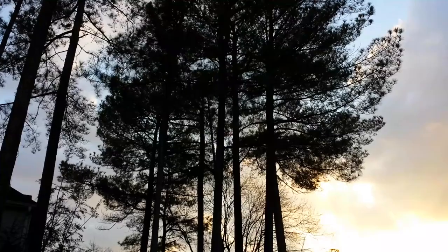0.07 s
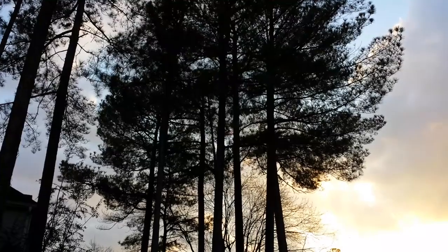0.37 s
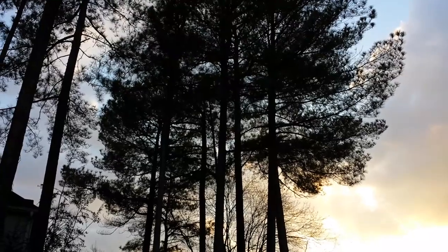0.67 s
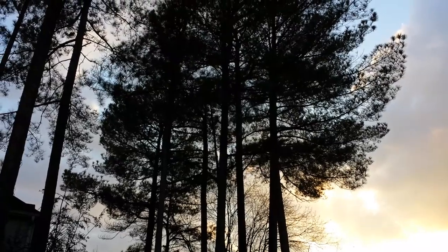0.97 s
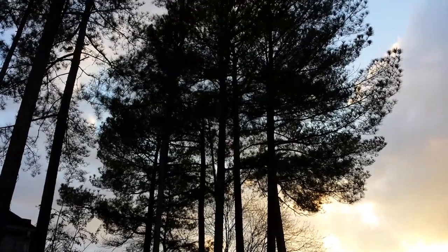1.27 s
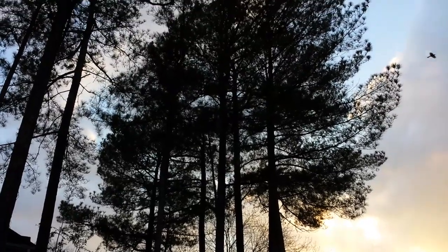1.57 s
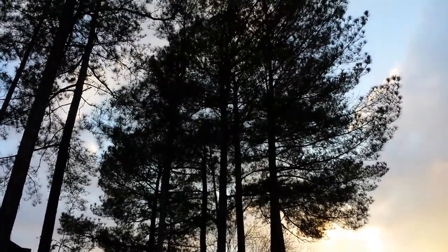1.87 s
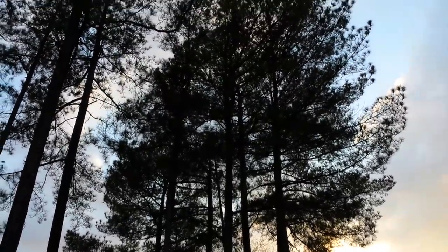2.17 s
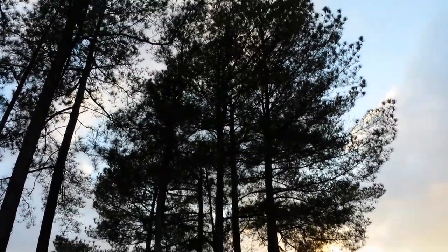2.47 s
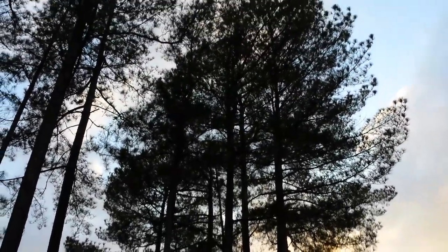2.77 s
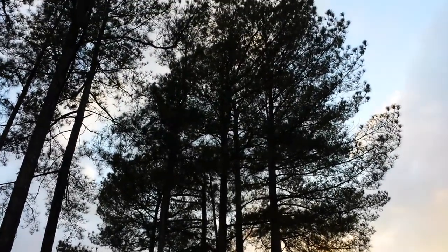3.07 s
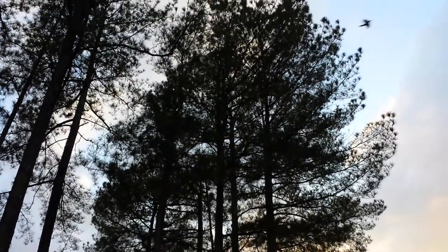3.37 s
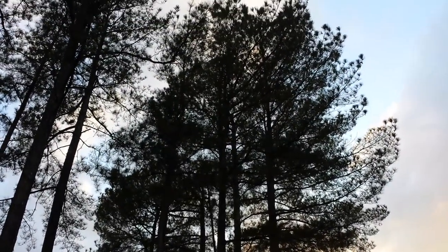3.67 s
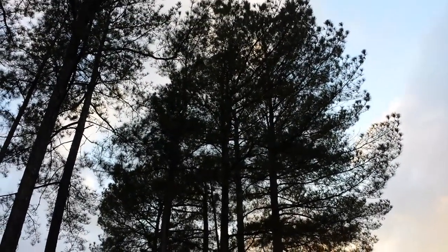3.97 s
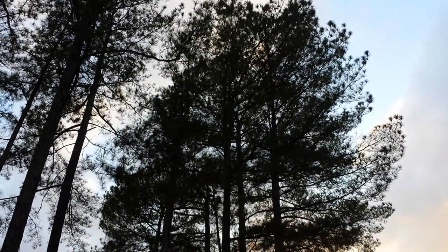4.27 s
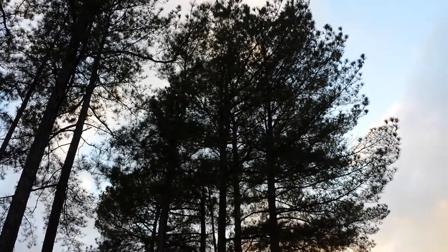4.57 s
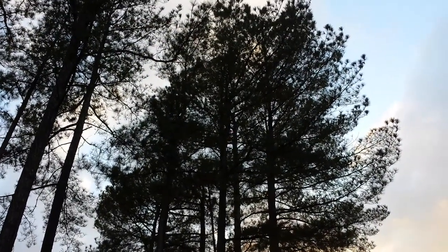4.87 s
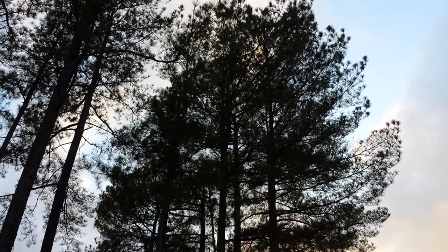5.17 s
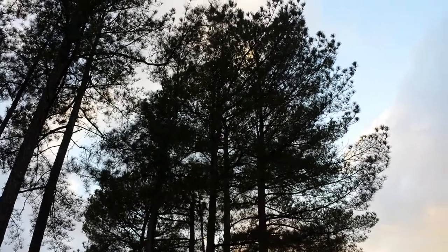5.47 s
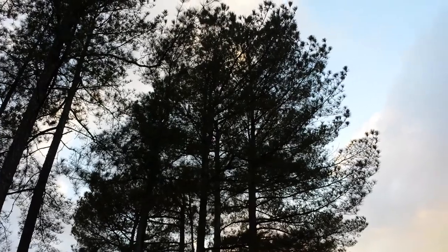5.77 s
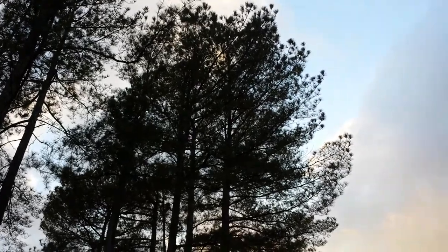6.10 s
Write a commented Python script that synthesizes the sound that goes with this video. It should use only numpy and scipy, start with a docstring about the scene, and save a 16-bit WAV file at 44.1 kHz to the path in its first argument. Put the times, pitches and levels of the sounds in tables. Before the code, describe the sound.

A large flock of birds chatters in tall pines, with nearer whistles and harsh calls over a faint low motor hum.

```python
"""Out of silence, a large flock of birds fades in, chattering in tall pines over a low rumble.
Hundreds of whistles and rasps merge into a chorus, scattered by trunks and crowns, and a far-off motor
starts to hum. Nearer birds then stand out with whistles, falling notes and harsh calls.
From about halfway a few ticks sound close to the single microphone, and a rustle there ends the scene."""
import sys
import numpy as np
from scipy import signal
from scipy.fft import rfft, irfft, next_fast_len
from scipy.io import wavfile
from scipy.ndimage import uniform_filter1d

SR = 44100
rng = np.random.default_rng(int(sys.argv[2]) if len(sys.argv) > 2 else 0)


def master(y):
    """Save y as 16-bit WAV."""
    cut = np.clip(np.atleast_2d(y).T, -1, 1)
    pcm = np.round(cut * 32767)  # scale
    wavfile.write(sys.argv[1], SR, pcm.astype(np.int16))


N = 279373


def from_db(db):
    """Turn decibels into a factor to multiply by."""
    return 10 ** (np.asarray(db) / 20)


def rms_one(x):
    """Scale a sound so that its average level (rms) is 1."""
    return x / np.sqrt(np.mean(x ** 2) + 1e-20)


def in_time(points):
    """Join (time, value) points with straight lines, giving a value for every sample."""
    times, values = np.transpose(points)
    return np.interp(np.arange(N) / SR, times, values)


def at_hz(points, hz):
    """Read a level between (frequency, level) points, with octaves evenly spaced."""
    frequencies, levels = np.transpose(points)
    return np.interp(np.log(np.maximum(hz, 1)), np.log(frequencies), levels)


def coloured(x, spectrum):
    """Make some frequencies louder and others softer; the result has rms 1."""
    size = next_fast_len(N)
    gain = from_db(at_hz(spectrum, np.fft.rfftfreq(size, 1 / SR)))
    return rms_one(irfft(rfft(x, size) * gain, size)[:N])


def wander(rate, size):
    """A random wobble that strays by about 1 and heads for a new value `rate` times a second."""
    steps = np.arange(size) * rate / SR + rng.random()
    values = rng.standard_normal(int(steps[-1]) + 2)
    return np.interp(steps, np.arange(len(values)), values) * np.sqrt(3 / 2)


def add(out, start, sound):
    """Mix a sound in at a time in seconds."""
    at = int(np.clip(start * SR, 0, N))
    out[at:at + len(sound)] += sound[:N - at]


def progress(length):
    """Count from 0 to 1 over a note's length in seconds."""
    return np.linspace(0, 1, max(int(length * SR), 64))


def curved_glide(length, hz, slide_hz, bend):
    """A slide through a pitch, with both ends lifted by `bend`, a share of that pitch."""
    from_middle = progress(length) - .5
    return hz * (1 + bend * (2 * from_middle) ** 2) + slide_hz * from_middle


def bird_note(glide, rough_hz, rough_rate, flutter_db, edge_s, overtone_db):
    """A tone follows a glide in Hz, shaking in pitch and level, with up to two overtones; rms 1."""
    # how loud an overtone is, by where it falls: (frequency [Hz], level [dB])
    overtones = [(4000, -9), (8400, -30), (9800, -38), (11100, -32.5), (12400, -33), (13500, -52),
                 (15500, -44)]
    size = len(glide)
    pitch = glide + rough_hz * wander(rough_rate, size)
    phase = (2 * np.pi * np.cumsum(pitch) / SR).astype(np.float32)
    tone = np.sin(phase)
    for k in (2, 3):
        if k * glide.max() < SR / 2:
            tone = tone + from_db(overtone_db + at_hz(overtones, k * glide[size // 2])) * np.sin(k * phase)
    along = np.linspace(0, 1, size)
    soft_edges = np.minimum(np.minimum(along, 1 - along) * size / SR / edge_s, 1)
    swell = 1 + 0.27 * np.sin(np.pi * along) ** 2
    flutter = from_db(flutter_db * wander(90, size))
    return rms_one(tone * soft_edges * swell * flutter)


def tree_echoes(x, echo_db):
    """Trunks and crowns send back a dying cloud of small echoes; the overall power stays the same."""
    echoes_per_s, delay_s, die_away_s = 2500, .006, .4
    t = np.arange(int(.7 * SR)) / SR
    echoes = rng.standard_normal(len(t)) * (rng.random(len(t)) < echoes_per_s / SR) * (t > delay_s)
    echoes *= from_db(-60 * t / die_away_s)
    response = from_db(echo_db) * echoes / np.linalg.norm(echoes)
    response[0] = 1  # the sound that arrives directly
    return signal.fftconvolve(x, response / np.linalg.norm(response))[:N]


def chorus(low_hz, high_hz, per_s):
    """Many birds in one pitch range call at random, some clear and some harsh, mostly sliding down."""
    # how loud a voice is, by its pitch: (pitch [Hz], level [dB])
    voice_levels = [(1100, -10.5), (1360, -17.5), (1600, -6), (1850, -11), (2400, -3), (3000, -9),
                    (3600, 1.5), (4250, -1), (4800, -5.5), (5400, -5.5), (6400, 0), (7000, -13.5),
                    (7700, -20)]
    out, count = np.zeros(N), int(per_s * N / SR)
    for k, (when, pitch, length, slide, bend, harsh, distance) in enumerate(rng.random((count, 7))):
        hz = low_hz + (high_hz - low_hz) * pitch
        glide = curved_glide(.025 + .1 * length ** 2, hz, slide_hz=-.44 * hz * (slide - .35),
                             bend=0.0997 * (bend - .5))
        overtone_db = 6.5 * rng.standard_normal()  # birds face every way, so their overtones differ
        note = bird_note(glide, rough_hz=hz * (0.015 + 0.0892 * harsh ** 2), rough_rate=1100,
                         flutter_db=1.5, edge_s=0.0098, overtone_db=overtone_db)
        gain = from_db(at_hz(voice_levels, hz) - 8.1 * distance)
        add(out, (k + 2 * when - 1) / per_s, gain * note)
    out = tree_echoes(out, echo_db=-3.0)
    return out / np.sqrt(uniform_filter1d(out ** 2, size=4000) + 1e-9)  # hold the level near rms 1


def flock():
    """Low, middle and high choruses and the blur of the farthest birds swell and ebb together."""
    # how hard the whole flock is calling: (time [s], level [dB])
    excitement = [(0.7, -1.5), (0.78, -4.5), (1.29, 0.5), (2.08, 1.5), (2.14, -1), (2.34, 1.0), (3.12, 0.5),
                  (3.19, 2.5), (3.9, -1.2), (4.03, 2.5), (4.1, 0), (4.41, -1.1), (4.58, 1.5), (5.05, 1.5),
                  (5.1, -3), (5.5, 1), (5.85, -0.3), (6.23, 0.8)]
    # the choruses: (lowest [Hz], highest [Hz], calls [per s], level [dB], follows excitement [factor])
    pitch_ranges = [(1202, 3100, 70, -38.5, 0.65), (3099, 4900, 75, -34.5, 1.4),
                    (4907, 7600, 70, -37.5, 1.1)]
    # the farthest birds blur into a smooth hiss: (frequency [Hz], level [dB])
    far_colour = [(500, -17), (1000, 1), (1600, 3.5), (2500, 8.5), (4000, 7), (6400, 4), (8000, -8),
                  (9800, -18.5), (12200, -21), (14000, -23.5), (15600, -26)]
    excitement_db = in_time(excitement)
    voices = sum(from_db(db + follows * excitement_db) * chorus(low, high, per_s)
                 for low, high, per_s, db, follows in pitch_ranges)
    far_birds = from_db(-35.5 + excitement_db) * coloured(rng.standard_normal(N), far_colour)
    return voices + far_birds


def distant_motor():
    """A motor's hum comes in over a low rumble and wavers about one pitch."""
    # the rumble swells and ebbs: (time [s], level [dB])
    rumble_levels = [(0.7, -48), (1.12, -43.5), (2.11, -43), (3.6, -47), (4.35, -40.5), (4.42, -44.5),
                     (4.82, -42.5), (4.92, -45.5), (6.33, -41.5)]
    # the rumble's deep tone colour: (frequency [Hz], level [dB])
    rumble_colour = [(20, -26), (35, -11.5), (52, -3.5), (68, -9.5), (90, 0), (150, 1.5), (190, 0.5),
                     (250, -3), (300, -3), (420, -7), (700, -7.5), (1000, -14.5), (1600, -15.5),
                     (4000, -69)]
    # how loud the hum's lowest tone is: (time [s], level [dB])
    hum_levels = [(0.7, -45.5), (1.67, -45.5), (1.72, -64), (1.75, -49.5), (2.11, -45.5), (4.04, -50.5),
                  (4.59, -44.5), (4.62, -56), (4.71, -42), (4.78, -59), (6.05, -47.5), (6.09, -55),
                  (6.25, -39.5), (6.33, -53)]
    # overtones that swell with the rumble: (multiple of the pitch [factor], level against the rumble [dB])
    hum_overtones = [(2, -6.5), (3, -12.5), (4, -20.5), (6, -18)]
    hum_hz, waver_hz, start_s, rise_s = 100.26, 1.197, 0.57, .11
    rumble_db = in_time(rumble_levels)
    phase = 2 * np.pi * np.cumsum(hum_hz + waver_hz * wander(12, N)) / SR
    hum = from_db(in_time(hum_levels) + 1.33 * wander(14, N)) * np.sqrt(2) * np.sin(phase)
    for k, db in hum_overtones:
        gain = from_db(rumble_db + db + 2.6 * wander(3.9, N))
        hum += gain * np.sin(k * phase + 0.42 * wander(12, N))
    entry = np.clip((np.arange(N) / SR - start_s) / rise_s, 0, 1)
    rumble = from_db(rumble_db) * coloured(rng.standard_normal(N), rumble_colour)
    return entry * hum + rumble


def shake(slide_hz, length):
    """How far a near note's pitch shakes, in Hz: steeper slides are rougher, up to a limit."""
    return min(32 + .003 * abs(slide_hz) / length, 120)


def whistles():
    """Near birds whistle clear notes, most of them nearly level in pitch."""
    # one whistle a row: (start [s], length [s], pitch [Hz], slide [Hz], level [dB])
    notes = [(.736, 0.1, 5470, 70, -41), (0.732, .19, 4280, -160, -37), (0.873, 0.16, 5120, 300, -36.5),
             (.901, .113, 3615, 76, -39), (1.225, 0.14, 3455, 166, -37), (1.316, 0.094, 4230, -410, -35),
             (1.928, 0.16, 1620, 17, -40.5), (2.238, 0.11, 2460, 900, -40), (2.28, .055, 4830, 90, -36),
             (2.331, .073, 4580, 800, -33), (2.599, .063, 4240, -330, -30), (2.649, 0.075, 4330, 150, -37),
             (3.047, 0.13, 4124, -100, -32.5), (3.132, 0.12, 3560, -870, -32.5),
             (3.201, .038, 4730, -60, -33), (3.45, 0.1, 4090, -15, -33), (3.53, 0.074, 3430, 130, -34.5),
             (3.601, .113, 4290, 0, -33.5), (3.71, 0.068, 4640, 650, -30.5),
             (3.728, 0.17, 4143, -230, -30.5), (3.776, 0.09, 4450, -310, -34),
             (4.007, 0.1, 3690, -54, -30.5), (4.309, 0.133, 5000, 240, -31.5),
             (4.432, 0.054, 2614, 120, -42), (4.501, 0.16, 4270, 90, -31), (4.661, 0.13, 4460, 286, -32),
             (4.669, 0.08, 3570, 57, -30), (5.038, 0.079, 3820, 26, -32), (5.449, 0.088, 4240, 73, -32.5),
             (5.52, .21, 3690, -880, -32), (5.903, 0.11, 4380, 120, -37), (6.221, 0.11, 4010, -670, -30.5),
             (6.261, 0.045, 6960, 920, -30)]
    out = np.zeros(N)
    for start, length, hz, slide_hz, db in notes:
        glide = curved_glide(length, hz, slide_hz, bend=0.2013 * length)
        note = bird_note(glide, shake(slide_hz, length), rough_rate=700,
                         flutter_db=3.0, edge_s=0.0095, overtone_db=1.5)
        add(out, start, from_db(db) * note)
    return out


def falling_notes():
    """Near birds sing notes that start high, drop quickly and settle."""
    # one note a row: (start [s], length [s], pitch it settles toward [Hz], drop [Hz], level [dB])
    notes = [(.985, .15, 3694, 1400, -34), (1.038, 0.066, 2310, 190, -37.5),
             (1.103, 0.093, 4800, 556, -36.5), (1.509, .085, 5170, 1186, -37.5),
             (1.818, 0.17, 3580, 400, -28.5), (2.061, 0.064, 2240, 129, -36.5),
             (2.482, 0.09, 4155, 801, -26), (2.941, 0.089, 4320, 2396, -27.5), (3.573, .14, 3774, 540, -32),
             (3.618, 0.035, 5500, 1245, -31), (3.751, .073, 2080, 740, -40),
             (5.182, 0.18, 4030, 452, -31.5)]
    settle_share = .28  # about two thirds of the drop is over after this share of the note
    out = np.zeros(N)
    for start, length, low_hz, drop_hz, db in notes:
        glide = low_hz + drop_hz * np.exp(-progress(length) / settle_share)
        note = bird_note(glide, shake(drop_hz, length), rough_rate=700,
                         flutter_db=3.5, edge_s=0.013, overtone_db=2)
        add(out, start, from_db(db) * note)
    return out


def rasps():
    """Near birds give harsh calls: the pitch shakes so fast that it smears into a band of noise."""
    # one call a row: (start [s], length [s], middle pitch [Hz], band width [Hz], level [dB])
    notes = [(1.181, .08, 4100, 1100, -33), (1.505, .055, 5800, 593, -33),
             (1.629, 0.057, 5400, 1760, -31.5), (1.647, 0.22, 3780, 450, -32),
             (1.91, .05, 5800, 1000, -33.5), (1.93, .16, 4700, 707, -35), (2.123, 0.12, 3400, 500, -34.5),
             (2.4, 0.092, 5500, 800, -34), (2.495, 0.091, 4150, 400, -32), (2.621, .11, 4000, 910, -34.5),
             (3.134, .12, 5600, 800, -34), (3.766, 0.098, 2533, 663, -36.5),
             (3.969, 0.065, 4100, 800, -30.5), (4.61, 0.026, 5000, 600, -34),
             (4.659, 0.092, 4000, 1200, -33), (4.81, 0.031, 3900, 600, -33),
             (4.97, 0.072, 3950, 800, -32.5), (5.198, .07, 4400, 1520, -33.5),
             (5.355, 0.021, 6000, 500, -35), (6.047, 0.092, 2900, 1490, -35)]
    out = np.zeros(N)
    for start, length, hz, width_hz, db in notes:
        steady_pitch = np.full_like(progress(length), hz)
        note = bird_note(steady_pitch, rough_hz=.5 * width_hz, rough_rate=1600,
                         flutter_db=1.5, edge_s=0.011, overtone_db=5.0)
        add(out, start, from_db(db) * note)
    return out


def ticks():
    """Tiny single slips by the microphone each ring for an instant."""
    # one tick a row: (time [s], peak level [dB], brightness [dB per octave])
    slips = [(2.8382, -16.5, -4), (3.2043, -16, 3), (3.372, -19, 13), (3.3731, -9.5, 4), (3.39, -15, -4),
             (4.0897, -12.5, -6), (4.5526, -8, -13)]
    # the tones a tick rings with: (frequency [Hz], level [dB], time to fall by 60 dB [s])
    tones = [(6340, -2, 0.0034), (8950, -5.5, 0.0018), (12340, -6.5, 0.0017), (14700, -11, 0.0013)]
    lowest_hz, rise_s = tones[0][0], 0.00043
    t = np.arange(400) / SR
    out = np.zeros(N)
    for start, peak_db, brightness in slips:
        tick = np.zeros(len(t))
        for hz, db, ring_s in tones:
            tone_db = db + brightness * np.log2(hz / lowest_hz) - 60 * t / ring_s
            tick += from_db(tone_db) * np.sin(2 * np.pi * hz * t)
        tick *= 1 - np.exp(-t / rise_s)
        add(out, start, from_db(peak_db) * tick / np.abs(tick).max())
    return out


def rustle():
    """Tiny slips by the microphone come so thickly that they merge into a rustle."""
    # the rustle rises at the very end: (time [s], level [dB])
    levels = [(6.2, -89), (6.24, -48), (6.255, -26.5), (6.33, -20)]
    # its bright tone colour: (frequency [Hz], level [dB])
    colour = [(1500, -46.5), (3000, -28), (4200, -4), (6200, 3), (7500, -2), (9000, -13), (11000, -26),
              (15500, -36)]
    slips_per_s = 14000
    slips = rng.standard_normal(N) * (rng.random(N) < slips_per_s / SR)
    return from_db(in_time(levels)) * coloured(slips, colour)


def scene():
    """All the sounds reach one microphone, which feeds both channels."""
    mono = distant_motor() + flock()
    mono += tree_echoes(whistles() + falling_notes(), echo_db=-8.5)
    mono += tree_echoes(rasps(), echo_db=-16)
    mono += ticks() + rustle()
    return np.array([mono, mono])


def record(dry):
    """The sound fades in from silence, and the highest treble is cut away."""
    fade_start_s, fade_s, cutoff_hz = 0.41, 0.33, 15650
    fade = np.clip((np.arange(N) / SR - fade_start_s) / fade_s, 0, 1) ** 1.52
    treble_cut = signal.ellip(12, .1, 90, cutoff_hz, fs=SR, output="sos")
    return signal.sosfilt(treble_cut, dry * fade + 1e-18)


dry = scene()
out = record(dry)
master(out)
```